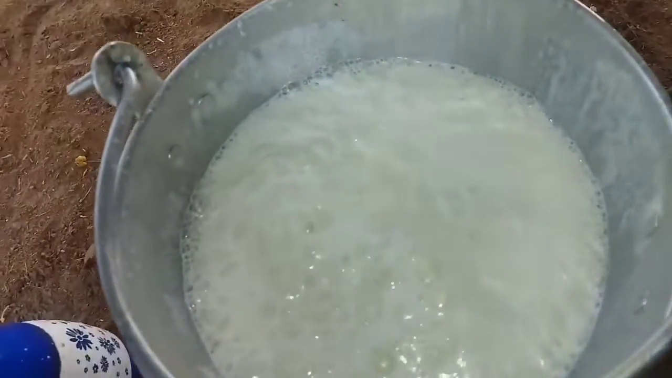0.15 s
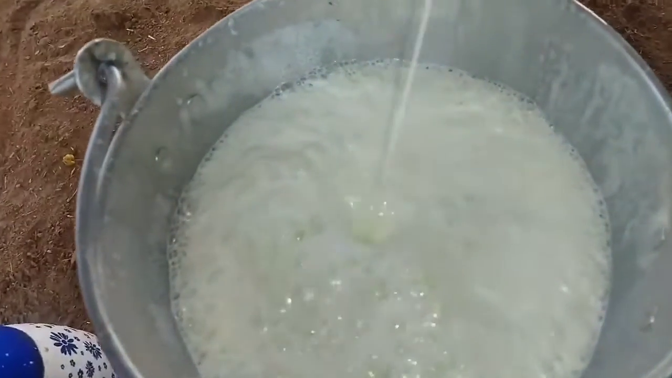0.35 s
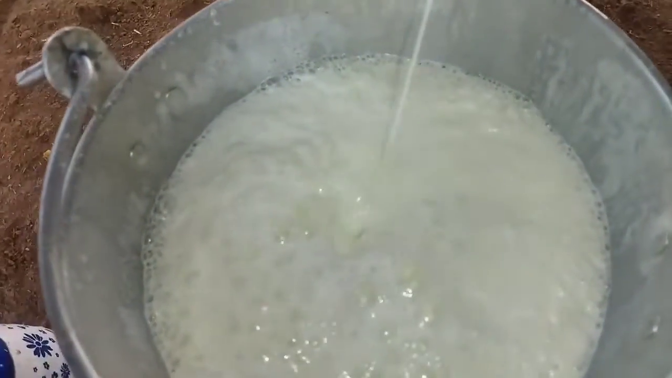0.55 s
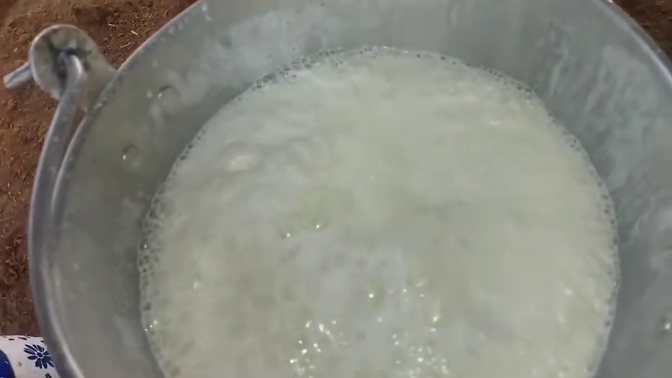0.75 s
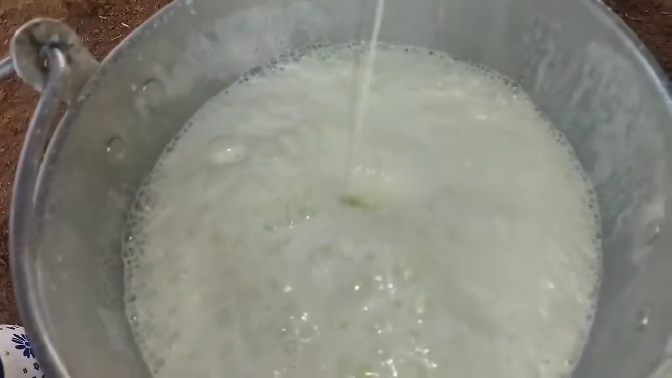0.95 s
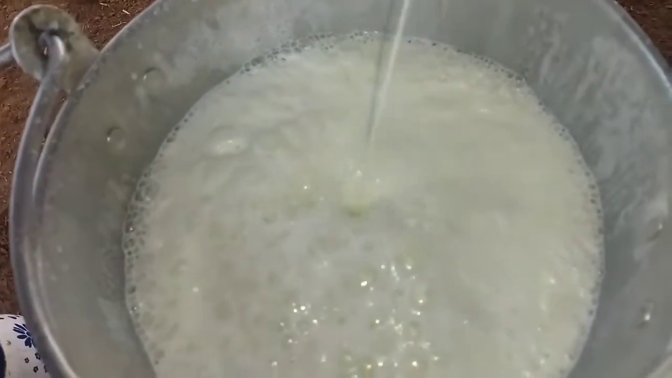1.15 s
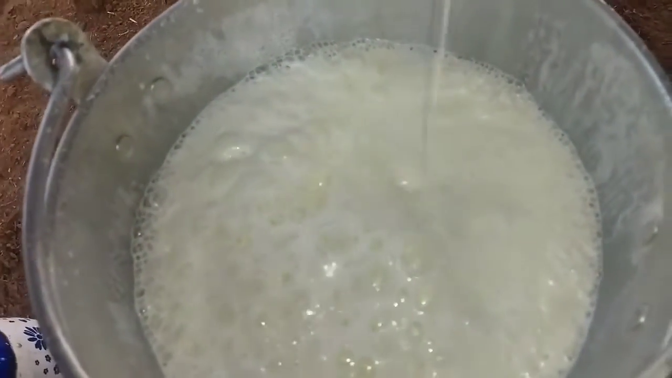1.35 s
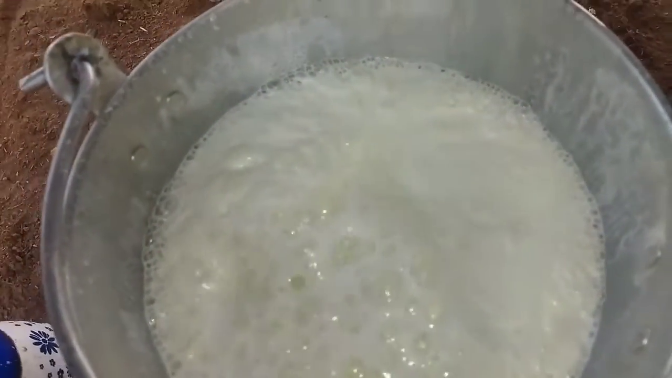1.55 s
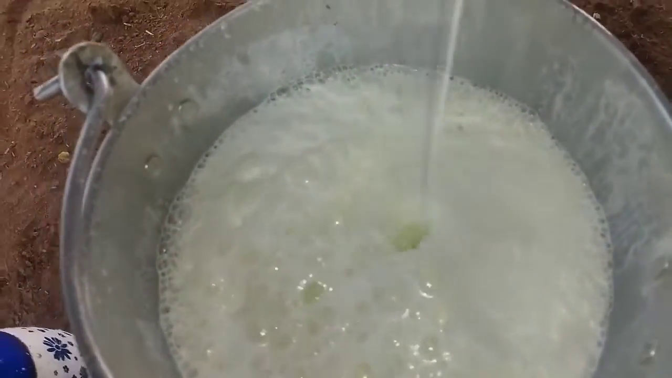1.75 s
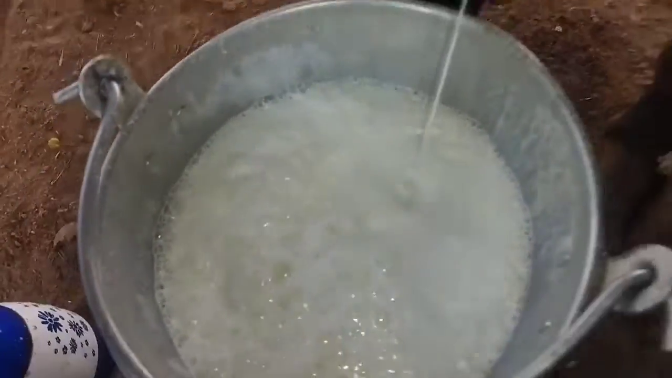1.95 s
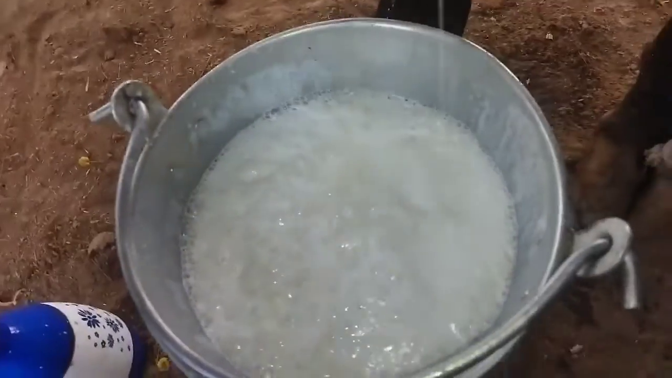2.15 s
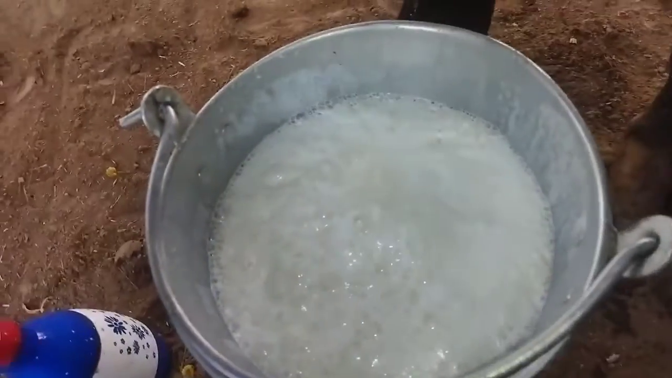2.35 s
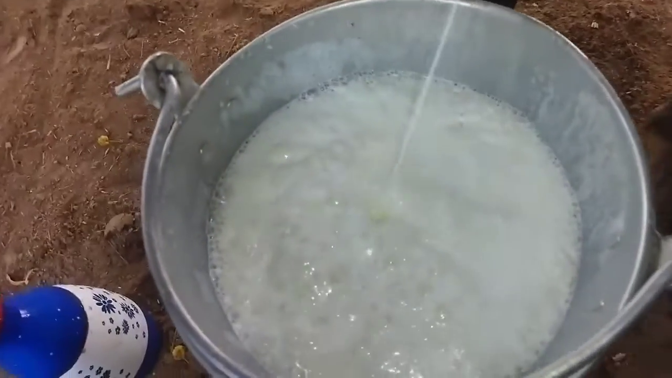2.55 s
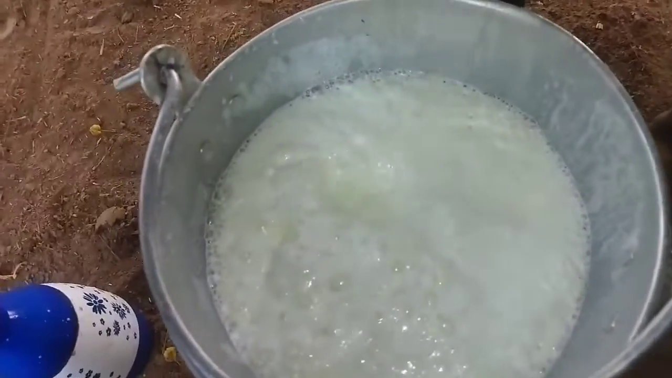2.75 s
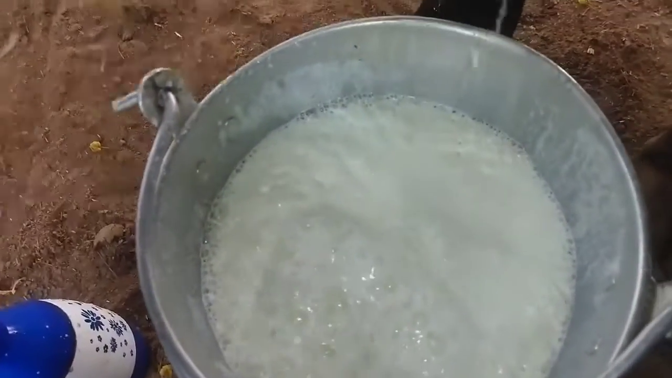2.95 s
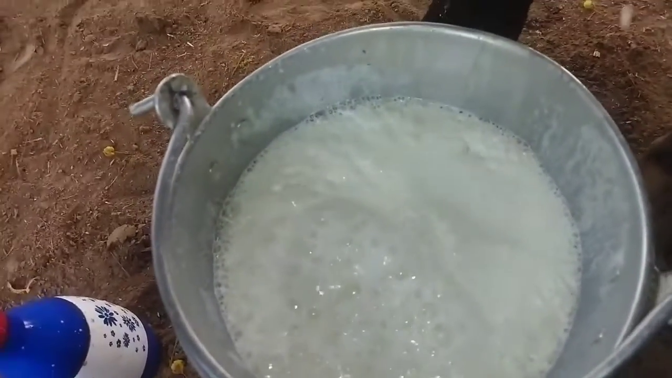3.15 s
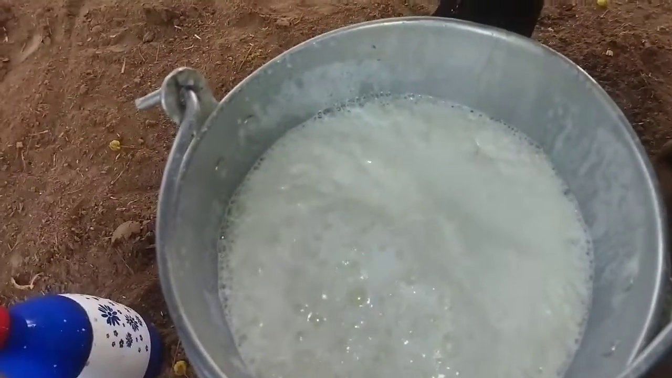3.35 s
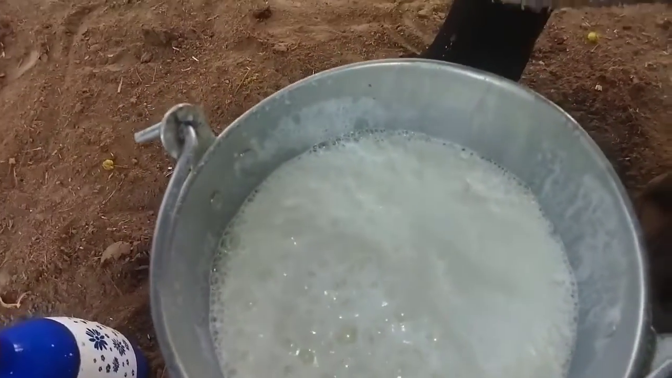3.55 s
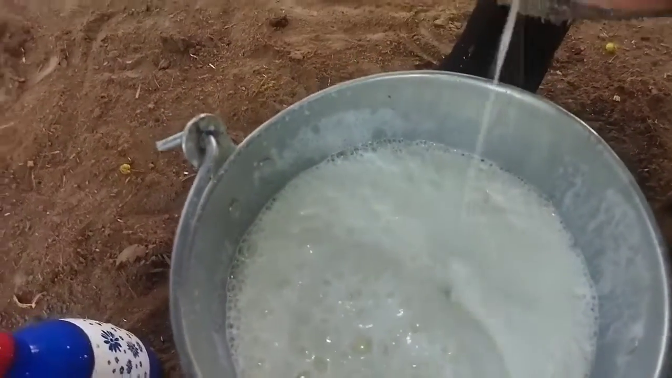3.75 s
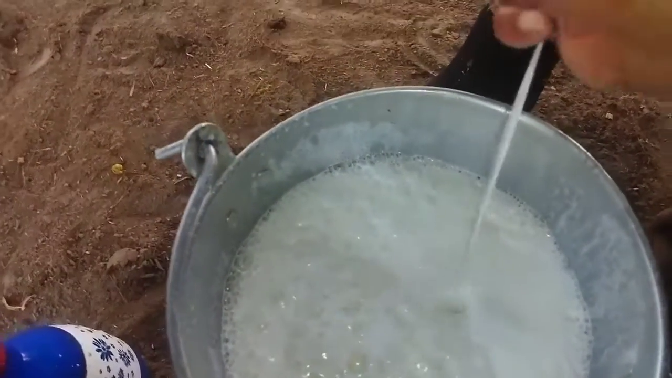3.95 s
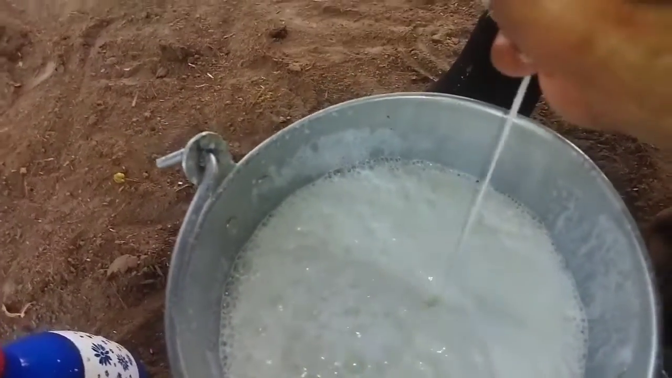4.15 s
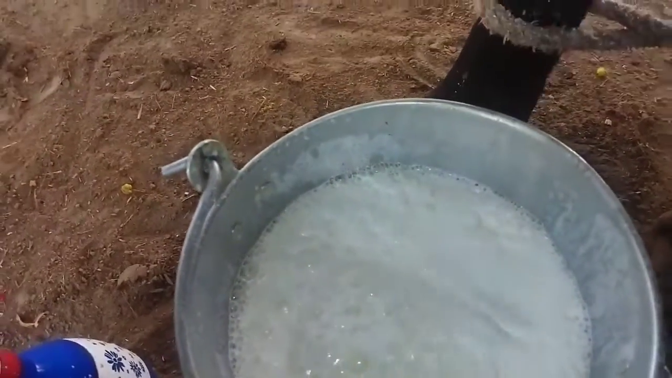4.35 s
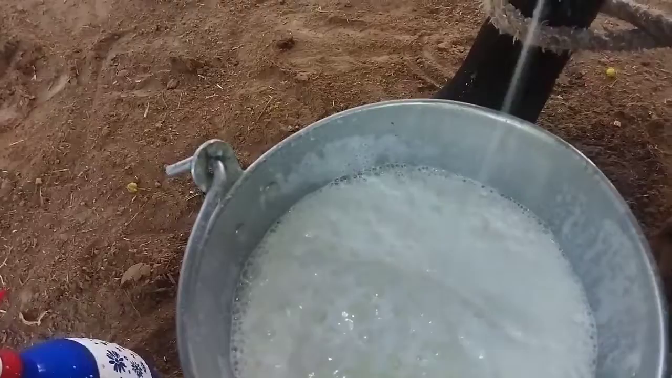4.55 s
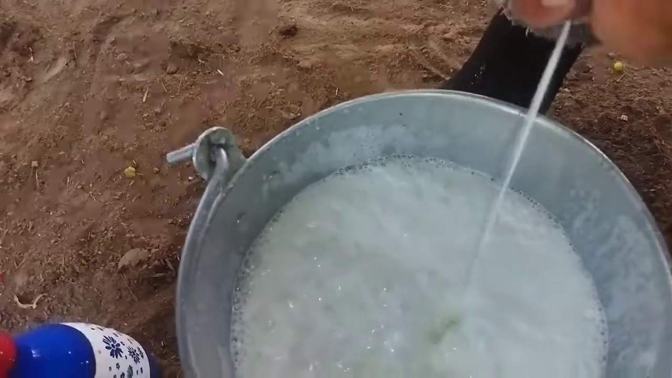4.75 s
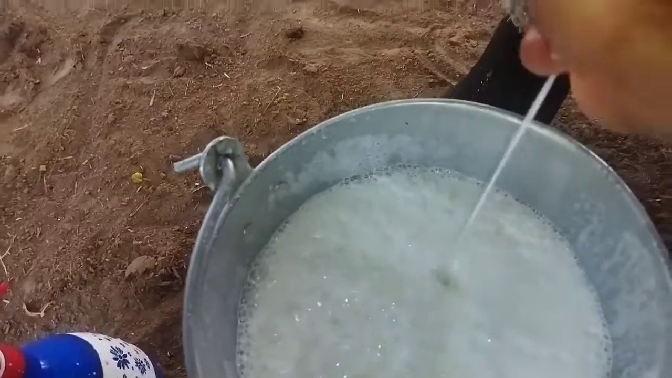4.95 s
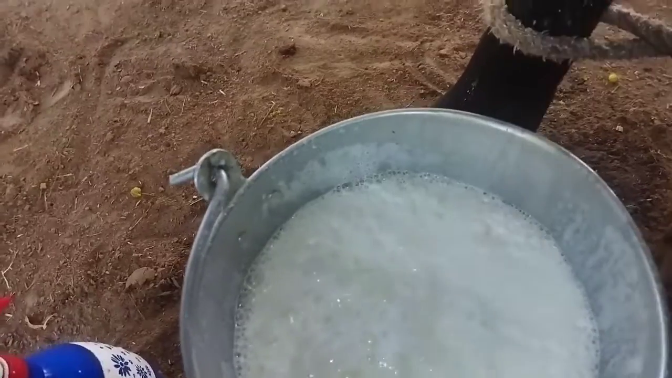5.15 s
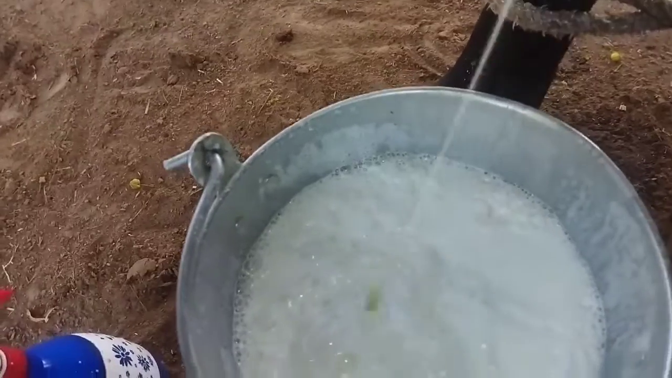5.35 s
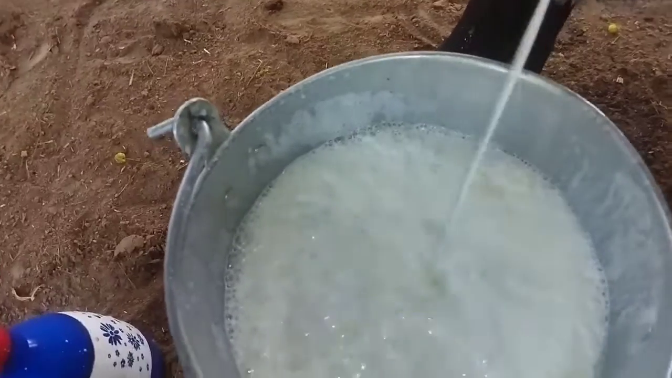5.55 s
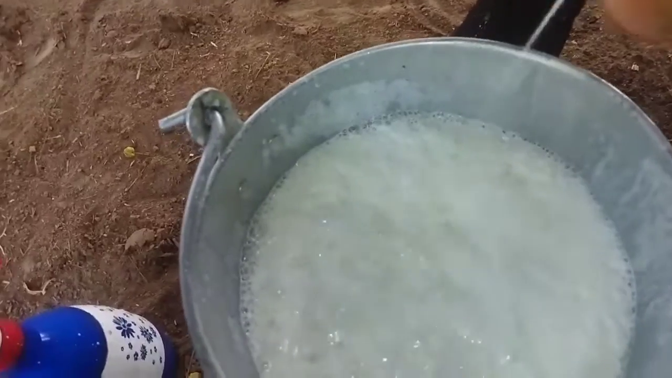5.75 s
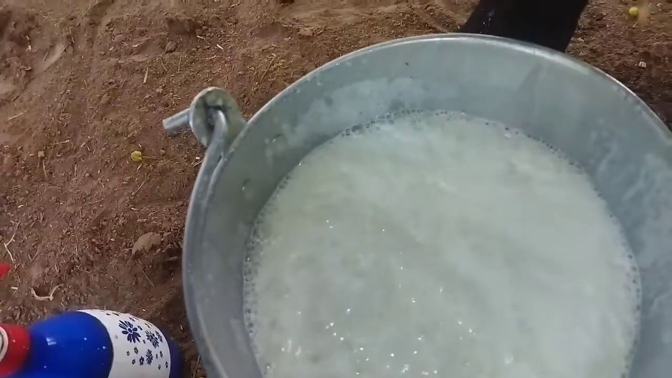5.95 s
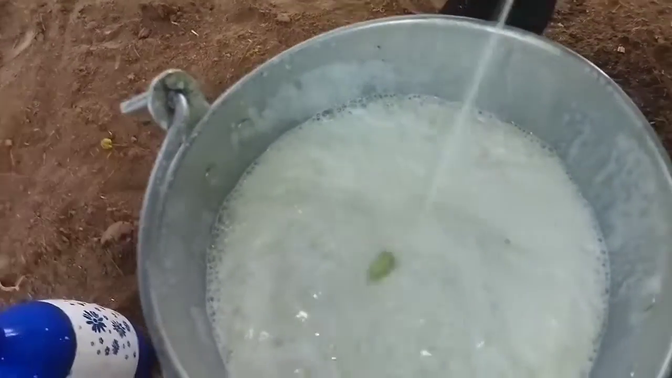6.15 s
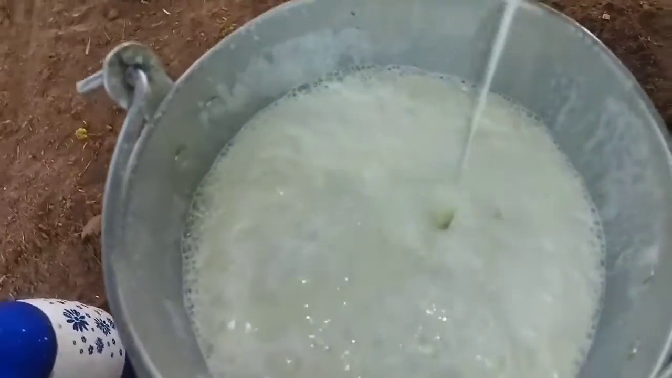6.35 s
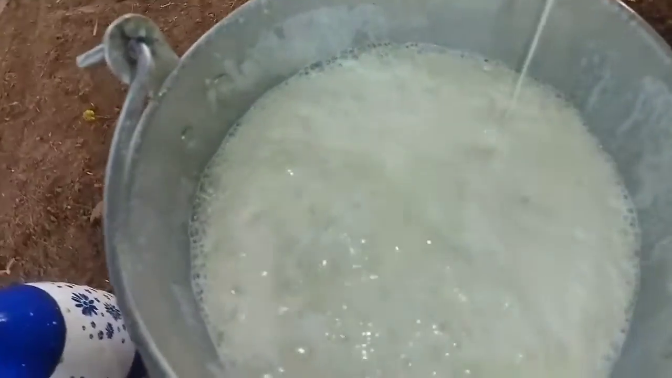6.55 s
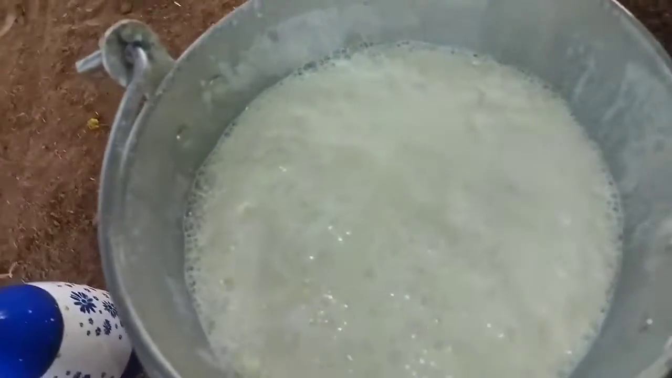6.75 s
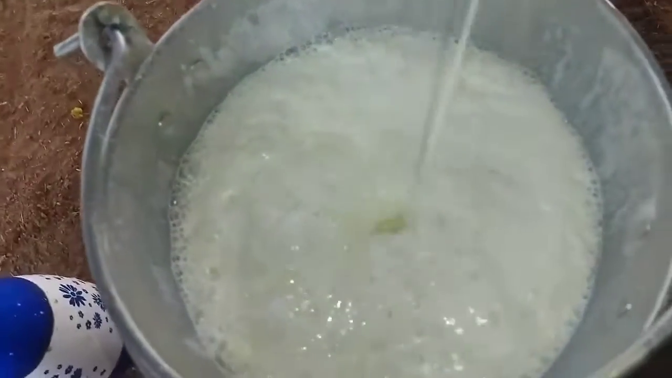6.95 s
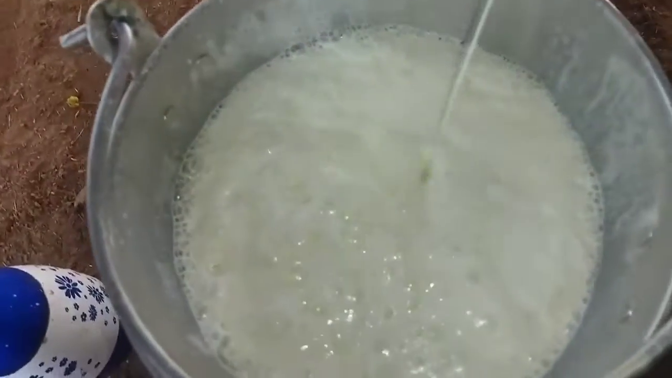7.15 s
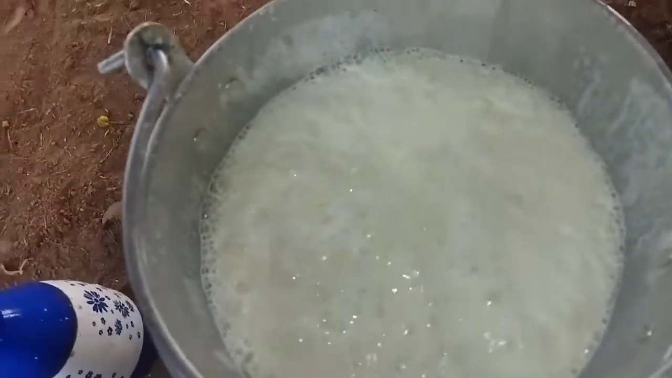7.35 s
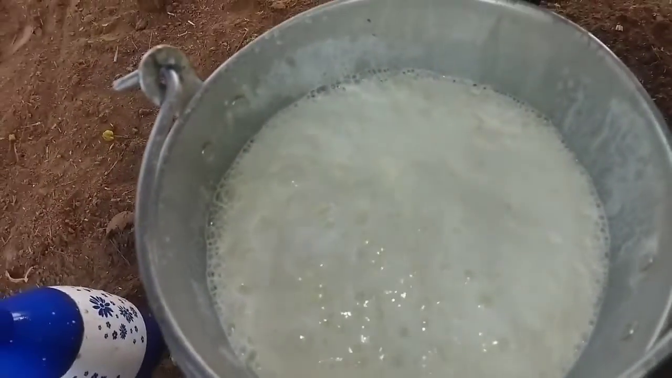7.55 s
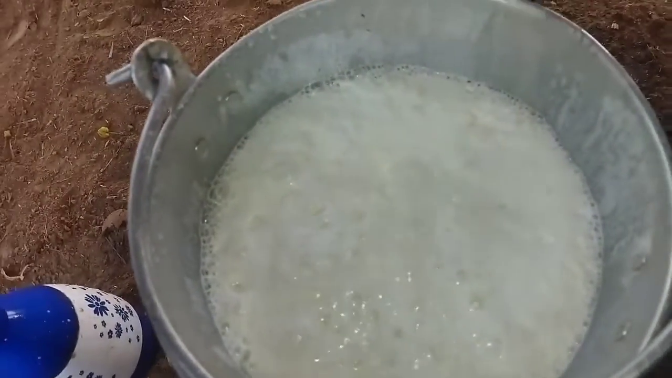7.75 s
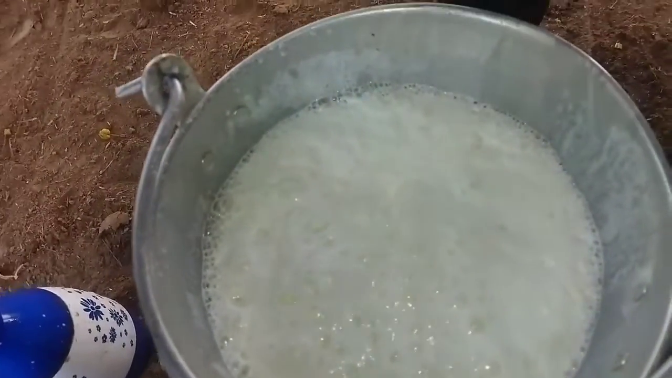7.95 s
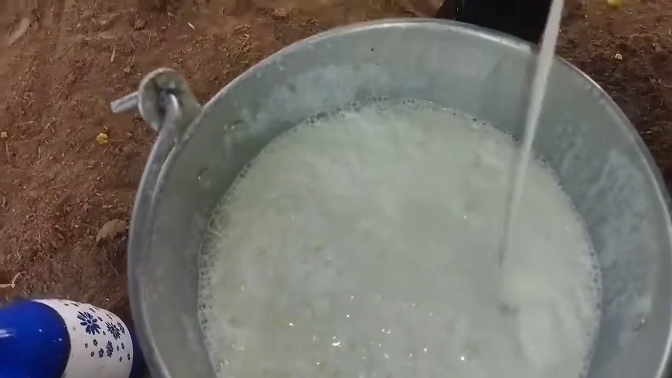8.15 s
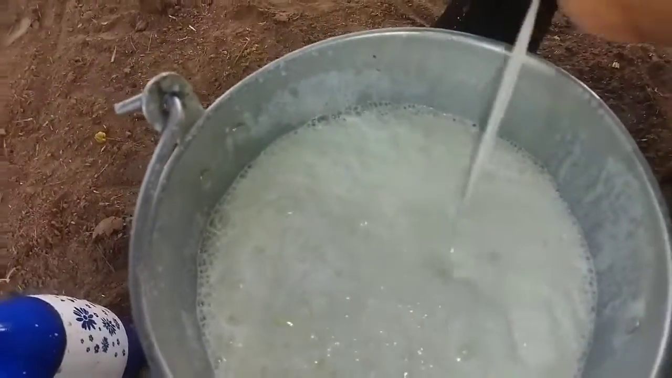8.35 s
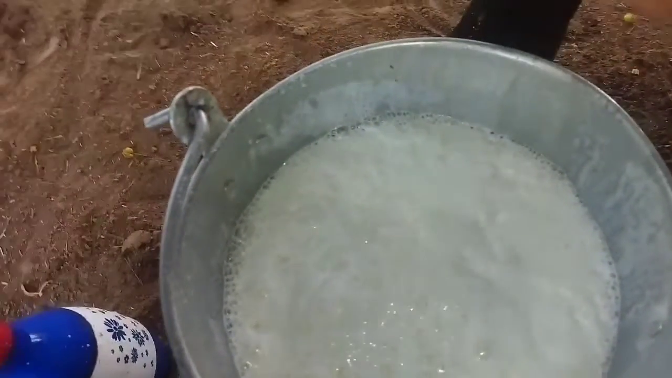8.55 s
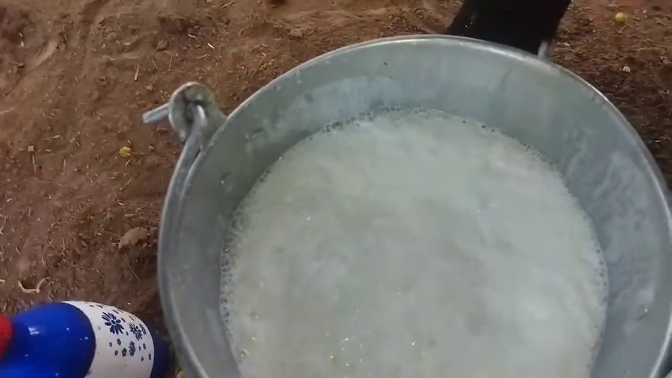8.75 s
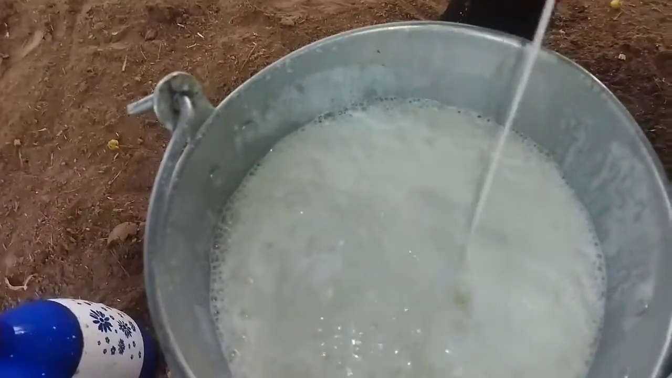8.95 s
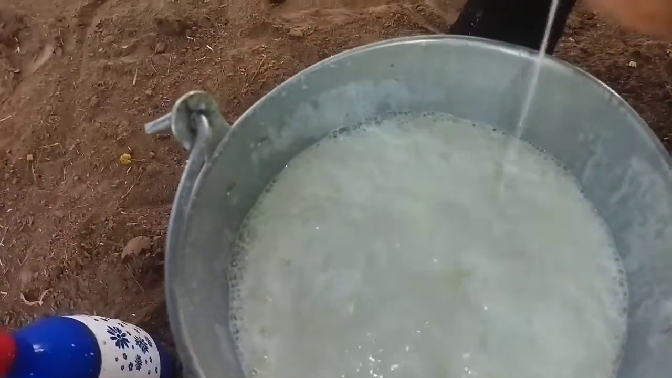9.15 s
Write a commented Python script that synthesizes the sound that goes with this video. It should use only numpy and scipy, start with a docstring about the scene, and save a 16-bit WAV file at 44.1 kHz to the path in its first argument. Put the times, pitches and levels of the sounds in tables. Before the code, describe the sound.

Close squirts of milk fizz and burble into a foam-filled metal pail in a steady rhythm, with brief pauses and a faint low hum.

```python
"""Hand milking into a metal bucket full of froth, close to a microphone pair; far across the yard an engine throbs.
From the first moment thin jets squirt one after another: each slaps the foam, tears it (spray and fizz)
and churns air into the milk (gurgle), while the bucket wall combs the hiss as the jet wanders.
From about 3 s on, the bucket is bumped softly now and then. Near 8 s a distant animal calls once,
and two last squirts follow."""
import sys
import numpy as np
from scipy import signal
from scipy.fft import rfft, irfft
from scipy.io import wavfile
from scipy.ndimage import uniform_filter1d, map_coordinates

SR = 44100
rng = np.random.default_rng(int(sys.argv[2]) if len(sys.argv) > 2 else 0)


def waveform_to_disk(signal):
    """Save audio, clipped to [-1, 1], as 16-bit WAV at the path in sys.argv[1]."""
    frames = np.transpose(np.atleast_2d(signal))
    scaled = np.clip(frames, -1, 1) * 32767
    samples = np.round(scaled).astype(np.int16)
    wavfile.write(sys.argv[1], SR, samples)


N = 409688
TIME = np.arange(N) / SR
FREQ = np.fft.rfftfreq(N, 1 / SR)

# Table levels are relative: the functions add their own gains.
# the microphone pair, left over right: f/Hz, level/dB
MIC_BALANCE = [(140, -1), (215, -6.5), (320, 1), (470, 10), (650, 3), (900, -7.5), (1350, 5), (1950, 0),
               (4000, 6.5), (6300, 5), (11700, 7.5), (15000, 12)]
# lead of the left microphone: f/Hz, phase/rad
MIC_LEAD = [(170, 0), (300, -.6), (430, -.3), (690, .6), (1380, 1), (2200, 0)]
# spectrum of the open yard: f/Hz, level/dB
YARD_SPECTRUM = [(130, -16), (220, 3.5), (293, 3.5), (537, -14.5), (714, -8.5), (1360, -11.5),
                 (2230, -13.5), (4170, -14), (8360, -28.5), (15600, -15.5)]
# speed of the far engine: t/s, firing rate/Hz
ENGINE_SPEED = [(0.0, 18.96), (2.8, 18.67), (3.8, 19.1), (4.2, 18.37), (4.7, 18.74), (6.5, 19.18),
                (7.5, 21.36), (8.4, 20.07), (9.29, 19.65)]
# the far animal's call: t/s, f/Hz, level/dB
ANIMAL_CALL = [(7.69, 240.3, -68), (7.73, 245, -54.5), (7.80, 247, -47.5), (7.86, 274, -54),
               (7.91, 267, -48), (7.95, 247, -62)]
# faint rustles and ticks: t/s, length/s, centre f/Hz, level/dB
RUSTLES = [(3.14, 0.084, 3900, -64), (3.473, 0.0088, 3820, -58), (3.568, .07, 1900, -59),
           (3.659, 0.092, 13000, -57.5), (3.68, .06, 4270, -66), (5.966, 0.12, 3450, -59.5),
           (6.818, 0.035, 2710, -63), (7.43, 0.11, 3750, -71), (8.137, 0.0088, 4500, -53.5)]
# soft bumps on the bucket: t/s, level/dB
BUCKET_BUMPS = [(3.346, -38.5), (6.099, -42.5), (6.842, -38.5), (6.895, -39), (6.964, -41.5),
                (8.697, -45.5), (8.868, -45)]
# modes of the bucket: f/Hz, level/dB, t60/s
BUCKET_MODES = [(227, -1, 0.086), (360, 3, 0.24), (396, 9.5, 0.054), (484, -6.5, 0.2)]
# single air pockets that ring out: t/s, level/dB, f/Hz, swell/cycles
SINGLE_BUBBLES = [(.402, -29, 768, 5), (.414, -32, 604, 2.6), (.665, -27, 736, 3.7), (1.139, -30, 620, 2.2),
                  (1.285, -34.5, 595, 7.3), (1.44, -31, 606, 5), (1.502, -33.5, 720, 6.2),
                  (4.415, -33, 886, 1.5), (6.318, -33, 846, 4.2), (6.554, -28.5, 817, 7.9),
                  (6.706, -37, 926, 4), (7.32, -33, 756, 5.6), (7.439, -36.5, 1050, 1.1),
                  (8.402, -32.5, 637, 3.6)]
# spurts and drops that hit the froth hard: t/s, splash level/dB, spit f/Hz, plop level/dB, plop f/Hz
SPURTS = [(.383, -24, 3000, -28, 384), (.42, -43, 3000, -29, 397), (.715, -28, 3020, -28, 930),
          (1.1094, -16.5, 2280, -16, 775), (1.1139, -23, 2300, -29, 910), (1.187, -20, 5000, -29, 815),
          (1.9758, -14, 3860, -32, 364), (2.1001, -27, 3500, -27, 844), (2.581, -25, 2300, -34, 2130),
          (2.6164, -19.5, 3200, -21, 360), (2.929, -37, 3000, -38, 796), (4.796, -12, 2960, -23, 354),
          (4.972, -15.5, 3300, -29.5, 570), (5.143, -15.5, 5760, -54, 296), (5.567, -19, 2400, -22, 396),
          (5.5969, -25, 2400, -14.5, 940), (6.384, -19, 4500, -24, 850), (7.0822, -19, 2100, -21.5, 890),
          (7.34, -19, 4120, -44, 930), (7.385, -25, 4400, -41, 950), (8.2325, -25, 12500, -34, 1640),
          (9.025, -27, 2750, -41, 600), (9.0444, -15, 4060, -28.5, 363)]
# spectra of the churned milk, the coarse spray and the fine fizz: f/Hz, level/dB
GURGLE_SPECTRUM = [(88, -36), (150, -5.5), (214, 4.5), (300, -1), (366, 3.5), (483, -6), (620, -1.5),
                   (880, 0.5), (1180, -16), (1380, -3.5), (1700, -13.5), (2080, -9), (3520, -120)]
SPRAY_SPECTRUM = [(650, -15), (1100, 0.5), (1390, 1.5), (1870, -3), (2320, 2.5), (3900, 1.5), (5200, -2),
                  (6640, -3.5), (7180, -7.5), (9540, -3.5), (11500, -9.5), (15000, -71)]
FIZZ_SPECTRUM = [(11400, -75), (11650, 15.5), (13500, 16), (15300, 22), (16000, -34)]
# one squeeze of the hand a row: t/s, rise/s, full flow/s, fall/s, second press after start/s,
# tip splash/dB, opening/dB, spray/dB, fizz/dB, gurgle/dB, plunge/dB, closing burble/dB, crater f/Hz,
# crater over gurgle/dB, hole ring start f/Hz, hole ring end f/Hz, hole ring level/dB, wall ring f/Hz
SQUEEZES = [(-.37, 0.067, .28, .17, .2, -29, 3, -38, -46, -33, 0, -56, 775, -6, 3000, 3000, -10, 5060),
            (.323, 0.042, 0.29, 0.28, .21, -25.5, -7, -41, -44, -43, 7.5, -42, 754, 2, 2370, 3100, 1, 4950),
            (1.071, 0.06, 0.29, 0.26, 0.32, -25.5, -5, -37.5, -43, -40.5, 7, -40, 685, -1, 3060, 3300, -4.5, 5130),
            (1.823, 0.063, .19, 0.38, 0.31, -28, -3, -35.5, -44.5, -37.5, -0.5, -40.5, 884, -5.5, 2800, 3830, -3, 5400),
            (2.557, 0.077, 0.27, 0.088, 0.23, -28.5, 1, -41, -47.5, -42.5, 3.5, -45, 860, -2, 3100, 3420, -6.5, 5160),
            (3.791, 0.19, 0.35, 0.15, .496, -48, -9.5, -39.5, -43, -39.5, 0.5, -48, 880, -11, 3770, 3780, 4.5, 2500),
            (4.733, 0.054, 0.36, 0.17, 0.24, -30, -0.5, -39.5, -42, -39.5, 1, -49, 840, -14, 4080, 4160, 9, 2340),
            (5.509, 0.028, 0.39, 0.07, .33, -24, -6, -38, -42, -41, 4, -48, 900, -8.5, 3670, 3800, 3.5, 2240),
            (6.283, 0.041, 0.3, 0.25, 0.255, -21, -1.5, -37, -44, -39.5, 4, -40, 850, -3.5, 3080, 4270, -3, 5200),
            (7.034, 0.044, 0.27, 0.14, 0.31, -23, 0, -38.5, -44.5, -39, 0, -52, 800, -2.5, 3000, 4500, -10, 5070),
            (8.187, 0.084, 0.29, 0.21, 0.23, -58, -7, -40.5, -46.5, -40.5, 3.5, -43.5, 854, -17, 1640, 2060, 0.5, 2930),
            (9.002, 0.034, 0.19, .22, 0.17, -25.5, -2, -39.5, -45, -40, 4, -44, 794, -10, 3700, 3400, -5, 4950)]


def gain_of(db):
    """Decibels to amplitude."""
    return 10 ** (np.asarray(db) / 20)


def unit_rms(x):
    """Scales a sound so that the mean of its channels has rms 1."""
    return x / np.sqrt(np.mean(np.atleast_2d(x).mean(0) ** 2) + 1e-20)


def spectrum(points):
    """Spreads a table over all frequencies, on a log axis."""
    hz, value = np.transpose(points)
    return np.interp(np.log(FREQ + 1), np.log(hz + 1), value)


def add(mix, s, sound):
    """Adds a sound to the mix at time s, or at 0 if s is negative."""
    part = mix[..., max(round(s * SR), 0):][..., :sound.shape[-1]]
    part += sound[..., :part.shape[-1]]


def colour(x, points):
    """Filters a sound by a table of f/Hz, level/dB."""
    return irfft(rfft(x) * gain_of(spectrum(points)), N)


def highpass(x, hz):
    """Rolls off the bass below hz."""
    return signal.sosfilt(signal.butter(2, hz, "high", fs=SR, output="sos"), x)


def resonate(x, hz, width_hz):
    """A resonance of gain 1 that follows the curve hz."""
    turn = np.exp(2j * np.pi * np.cumsum(hz) / SR)
    pole = np.exp(-np.pi * width_hz / SR)
    return 2 * (turn * signal.lfilter([1 - pole], [1, -pole], x / turn + 1e-18)).real


def wander(hz):
    """A smooth random curve of rms 1 that swings up to about hz times a second."""
    knots, steps = rng.standard_normal(2000), TIME[::50]
    curve = map_coordinates(knots, [steps * hz * 2], mode="wrap")
    return unit_rms(np.interp(TIME, steps, curve))


def clicks(per_s, spread_db):
    """Random pops of either sign and uneven size."""
    chance, train = rng.random(N) * SR / per_s, np.zeros(N)
    at = np.flatnonzero(chance < 1)
    train[at] = (-1.) ** at * gain_of(spread_db * np.minimum(-np.log(chance[at]), 5))
    return train


def mic_pair(x):
    """The two microphones hear the bucket from different sides, each with its own level and phase."""
    side = np.array([[.5], [-.5]])
    tilt = gain_of(side * spectrum(MIC_BALANCE))
    turn = np.exp(1j * side * spectrum(MIC_LEAD))
    return irfft(rfft(x) * turn * tilt / tilt.mean(0), N)


def yard(level_db=-59.5, swell_db=.4, crackle_db=-8, clumps_db=5):
    """Quiet outdoor air around the microphones, and the faint crackle of settling froth."""
    air = unit_rms(rng.standard_normal(N) + rng.standard_normal((2, N)))
    crackle = unit_rms(clicks(per_s=310, spread_db=-0.5) * gain_of(clumps_db * wander(hz=7)))
    ambience = mic_pair(colour(air + gain_of(crackle_db) * crackle, YARD_SPECTRUM))
    return gain_of(level_db + swell_db * wander(hz=24.1)) * unit_rms(ambience)


def far_engine(level_db=-55.5, exhaust_hz=145, sweep_hz_per_s=2000, thud_s=0.0078, rumble_db=-66):
    """One dull exhaust thud a firing; distance leaves only the bass, over a low rumble."""
    cycles = np.cumsum(np.interp(TIME, *np.transpose(ENGINE_SPEED))) / SR - .395
    firings = np.diff(np.floor(cycles), prepend=-1) * gain_of(2 * rng.standard_normal(N))  # 2 dB uneven
    t = np.arange(-SR // 30, SR // 30) / SR
    thud = np.sin(2 * np.pi * (exhaust_hz * t + sweep_hz_per_s * t ** 2 / 2)) / np.cosh(t / thud_s)
    throb = signal.oaconvolve(firings, thud, "same")
    rumble = colour(rng.standard_normal(N),
                    [(25, -38), (45, -26), (90, 4.5), (170, -8.5), (300, -14), (600, -17), (2000, -74)])
    return gain_of(level_db) * unit_rms(throb) + gain_of(rumble_db) * unit_rms(rumble)


def far_animal(waver=0.013):
    """A soft, nearly pure hoot in the distance that bends up and back."""
    s, hz, db = np.transpose(ANIMAL_CALL)
    pitch = np.interp(TIME, s, hz) * (1 + waver * wander(hz=30.1))
    swell = gain_of(np.interp(TIME, s, db, left=-120, right=-120))
    return swell * np.sqrt(2) * np.sin(2 * np.pi * np.cumsum(pitch) / SR)


def rustles(width_share=0.51):
    """Small gritty rustles and ticks in the pauses."""
    out, grit = np.zeros(N), clicks(per_s=2800, spread_db=1)
    for s, length, hz, db in RUSTLES:
        swell = np.hanning(round(length * SR))
        centre, width_hz = np.full(len(swell), hz), width_share * hz
        grains = grit[round(s * SR):][:len(swell)]
        band = resonate(resonate(grains, centre, width_hz), centre, width_hz)
        add(out, s, gain_of(db) * swell * unit_rms(band))
    return mic_pair(out)


def bucket_bumps(level_db=-6, scuff_s=0.049, knock=26):
    """A soft knock and a short scuff set the milk-damped bucket ringing, dull and uneven."""
    out, t = np.zeros(N), TIME[:SR // 2]
    modes = sum(gain_of(db - 60 * t / t60) * np.sin(2 * np.pi * hz * t) for hz, db, t60 in BUCKET_MODES)
    ring = highpass(modes, hz=200)
    for s, db in BUCKET_BUMPS:
        force = rng.standard_normal(len(t)) * np.exp(-t / scuff_s) + knock * (t == 0)
        bump = signal.fftconvolve(force, ring)
        add(out, s, gain_of(db + level_db) * 2 * bump / abs(bump).max())
    return mic_pair(out)


def bucket_air(x, wet_db, t60):
    """The short diffuse ring of the space above the milk, too small to hold bass."""
    t = TIME[:SR // 4]
    tail = highpass(rng.standard_normal((2, len(t))), hz=500) * gain_of(-60 * t / t60)
    return x + gain_of(wet_db) * signal.fftconvolve(x, tail / np.linalg.norm(tail[0]), axes=1)[:, :N]


def single_bubbles(glide=0.0099):
    """A lone air pocket swells within a few cycles and dies away, rising a little in pitch."""
    out = np.zeros(N)
    for s, db, hz, cycles in SINGLE_BUBBLES:
        age = TIME[:SR // 10] * hz / cycles
        phase = 2 * np.pi * cycles * age * (1 + glide * (age / 2 - 1))
        add(out, s, gain_of(db) * age * np.exp(1 - age) * np.sin(phase))
    return mic_pair(out)


def bubble(hz, cycles, rise):
    """An air pocket rings for a few cycles, damped by the froth, and rises in pitch."""
    age = TIME[:SR // 10] * hz / cycles
    envelope = np.exp(-age) * (1 - np.exp(-2 * cycles * age))
    phase = 2 * np.pi * cycles * (age + rise * age ** 2 / 2)
    return np.gradient(envelope * np.sin(phase)) * SR / (2 * np.pi * hz)


def bubble_swarm(density, spread_db, cycles, rise, sizes=24):
    """Air pockets of many sizes, even in spectrum; the small ones come more often."""
    swarm = np.zeros(N)
    for hz in np.geomspace(160, 1600, sizes):
        train = clicks(density / sizes * np.sqrt(hz / 500), spread_db)
        swarm += np.sqrt(hz) * unit_rms(signal.oaconvolve(train, bubble(hz, cycles, rise))[:N])
    return unit_rms(swarm)


def current_squeeze():
    """The row of the latest squeeze at every moment."""
    return np.searchsorted([row[0] for row in SQUEEZES[1:]], TIME)


def hand_squeezes(closed_db=-13, fall_db=38.5, press_width_s=0.033, plunge_lag_s=0.025, plunge_s=0.057):
    """Spray, fizz, gurgle and crater amplitudes: each jet opens, plunges, surges and burbles out."""
    levels, t = np.zeros((4, N)), TIME[:SR]
    settling_db = -23 - 16 * t  # stirred froth goes on fizzing
    thin_jet_db = 7.5 * np.exp(-t / 0.065)  # extra fizz while the jet is still thin
    for start, rise, full, fall, press_s, _, opening_db, *rest in SQUEEZES:
        spray_db, fizz_db, gurgle_db, plunge_db, burble_db, _, crater_db, *_ = rest
        closed = np.maximum(1 - (t / rise) ** 0.97, 0)
        falling = (t - rise - full) / fall
        flow_db = (closed_db + opening_db) * closed - fall_db * np.maximum(falling, 0)
        plunge = np.exp(-((t - rise - plunge_lag_s) / plunge_s) ** 2)  # the jet breaks through the froth
        press = np.exp(-((t - press_s) / press_width_s) ** 2)  # the last fingers close
        burble = gain_of(burble_db) / np.cosh((falling - 0.27) / 0.15)  # the slack jet breaks into beads
        hiss_db = np.maximum(flow_db, settling_db)
        spray = gain_of(spray_db + hiss_db + 3.5 * press)
        fizz = gain_of(fizz_db + hiss_db + 1.75 * press + thin_jet_db)
        churn = gain_of(gurgle_db + flow_db + 2.5 * press + plunge_db * plunge)
        stroke = np.array([spray, fizz, np.hypot(churn, burble), churn * gain_of(crater_db)])
        add(levels, start, stroke[:, t >= -start])
    return uniform_filter1d(levels, size=50)


def crater(flow, level_db=-0.5, width_hz=460, sway=0.038):
    """Bubbles burst in the hole that the jet digs in the froth: a gargle that sways with the hole."""
    hz = np.array(SQUEEZES)[current_squeeze(), 12] * (1 + sway * wander(hz=9))
    bubbles = bubble_swarm(density=480, spread_db=0.5, cycles=6, rise=0.04)
    gargle = resonate(resonate(bubbles, hz, width_hz), hz, width_hz)
    muffled = colour(gargle, [(700, -2.5), (1100, -5.0)])  # the froth takes off the top
    return gain_of(level_db) * unit_rms(mic_pair(muffled)) * flow


def gurgle(flow, lumps_db=2.74, clear_db=-2.5):
    """Air driven deep under the surface: a churn of damped pockets and a few clear ones."""
    churn = bubble_swarm(density=1100, spread_db=2.0, cycles=1.36, rise=0.033)
    churn *= gain_of(lumps_db * wander(hz=30.47))
    churn += gain_of(clear_db) * bubble_swarm(density=100, spread_db=0.5, cycles=10.8, rise=0.042)
    return bucket_air(unit_rms(mic_pair(colour(churn, GURGLE_SPECTRUM))) * flow, wet_db=-9, t60=0.069)


def jet_tips(spit_hz=4500, plop_db=-15.5, plop_hz=927):
    """The first touch of each jet on the froth, as rows like those of SPURTS."""
    return [(s, db, spit_hz, db + plop_db, plop_hz) for s, _, _, _, _, db, *_ in SQUEEZES if s > 0]


def splats(splash_s=0.0032, spit_db=4, large_db=3, cluster_db=-5):
    """A spurt slaps the froth: a brief pitched spit, one large pocket and a cluster of small ones."""
    spatter, plops = np.zeros(N), np.zeros(N)
    t = TIME[:SR // 10]
    for s, splash_db, spit_hz, plop_db, plop_hz in SPURTS + jet_tips():
        burst = gain_of(splash_db - 1) * np.exp(-t / splash_s) * rng.standard_normal(len(t)) / 2
        spit = signal.lfilter(*signal.iirpeak(spit_hz, Q=2.5, fs=SR), burst)
        add(spatter, s, burst + gain_of(spit_db) * spit)
        add(plops, s, gain_of(plop_db + large_db) * bubble(plop_hz, cycles=2.46, rise=0.033))
        for hz in np.geomspace(500, 1900, 4) * rng.uniform(0.995, 1.15, 4):
            small = gain_of(plop_db + cluster_db) * bubble(hz, cycles=1.85, rise=0.043)
            add(plops, s + rng.uniform(0, 0.00272), small)
    bright = colour(spatter, [(100, -40), (500, -24), (1500, 1.5), (4500, -4.5),
                              (8000, -12.5), (11400, -12), (11700, -2.5)])
    return bucket_air(mic_pair(bright + plops), wet_db=-8, t60=0.06)


def wall_echoes(x, echo=0.71, delay_range_s=(0.0007, .0036), drift_s=.00011, count=4):
    """Reflections off the bucket wall: each jet lands on a new spot and wanders, so the comb shifts."""
    squeeze, out = current_squeeze(), x.copy()
    for _ in range(count):
        delay = rng.uniform(*delay_range_s, len(SQUEEZES))[squeeze] + drift_s * wander(hz=2.6)
        out += echo * rng.choice([-1, 1]) * map_coordinates(x, [(TIME - delay) * SR], order=2)
    return out


def hole_and_wall_rings(x, hole_width_hz=900, wall_width_hz=400, wall_db=-4, sway=.035):
    """The hole in the froth rings broadly and glides as the jet digs; the wall adds a narrower ring."""
    start, rise, full, *_, first_hz, last_hz, hole_db, wall_hz = np.array(SQUEEZES)[current_squeeze()].T
    hole_hz = first_hz + (last_hz - first_hz) * np.clip((TIME - start) / (rise + full), 0, 1)
    drift = 1 + sway * wander(hz=4)
    hole = gain_of(hole_db) * resonate(x, hole_hz * drift, hole_width_hz)
    wall = gain_of(wall_db) * resonate(x, wall_hz * drift, wall_width_hz)
    return x + hole + wall


def foam(spray, fizz, spray_db=-3, fizz_db=2, flutter_db=1, surge_db=1.16):
    """Right at the microphones the jet bursts thousands of tiny bubbles, unevenly as it beads."""
    pops = clicks(per_s=3600, spread_db=2.5)
    pops *= gain_of(-flutter_db * wander(hz=74.4) + surge_db * wander(hz=12))
    # two bounces; each microphone has its own paths
    hiss = mic_pair(np.array([wall_echoes(wall_echoes(pops)) for _ in range(2)]))
    coarse = hole_and_wall_rings(unit_rms(colour(hiss, SPRAY_SPECTRUM)))
    coarse *= gain_of(1.3 * wander(hz=32))  # the spray flickers
    fine = unit_rms(colour(hiss, FIZZ_SPECTRUM))
    froth = gain_of(spray_db) * spray * coarse + gain_of(fizz_db) * fizz * fine
    return bucket_air(froth, wet_db=-22, t60=.08)


def scene():
    """Milk and bucket close to the microphones, engine and animal far off."""
    spray, fizz, churn, gargle = hand_squeezes()
    milk = foam(spray, fizz) + gurgle(churn) + crater(gargle) + splats() + single_bubbles()
    return milk + bucket_bumps() + yard() + far_engine() + far_animal() + rustles()


def record(dry):
    """The recorder's band limit."""
    lowpass = signal.firwin(511, cutoff=15620, window=("kaiser", 9), fs=SR)
    return signal.oaconvolve(dry, lowpass[None], "same", axes=1)


dry = scene()
out = record(dry)
waveform_to_disk(out)
```